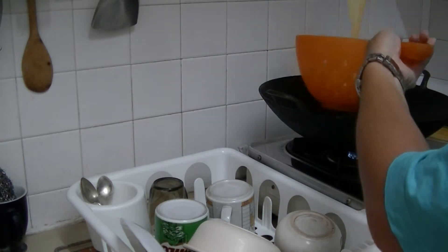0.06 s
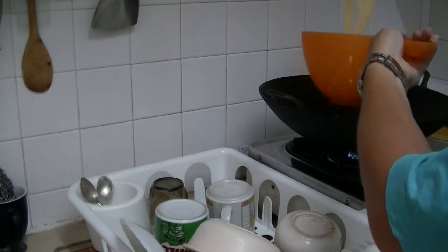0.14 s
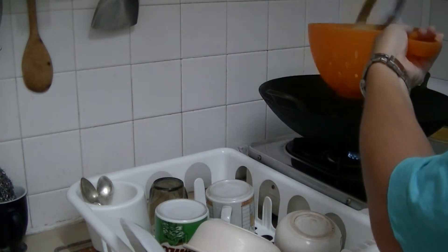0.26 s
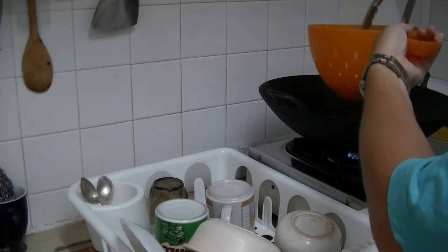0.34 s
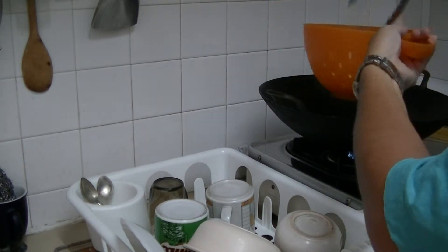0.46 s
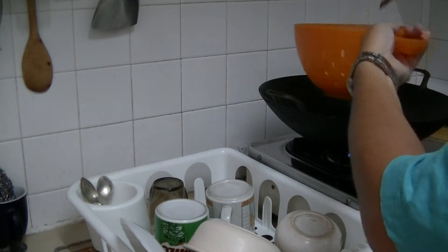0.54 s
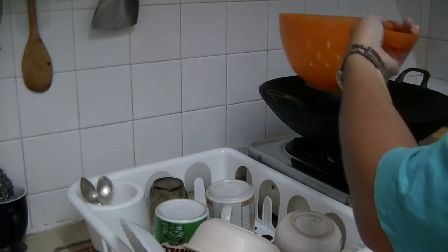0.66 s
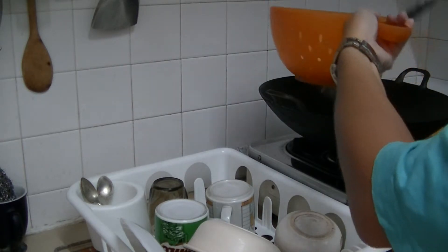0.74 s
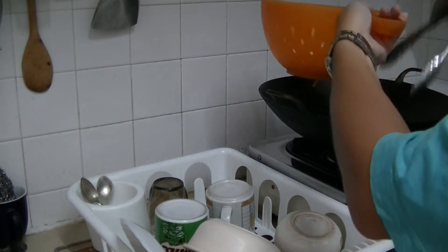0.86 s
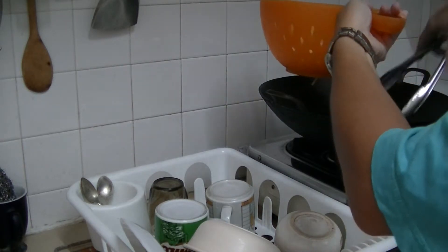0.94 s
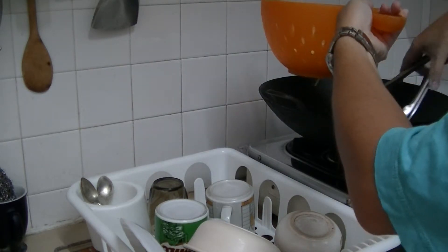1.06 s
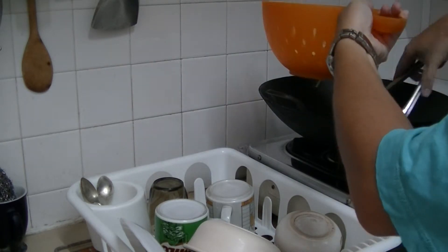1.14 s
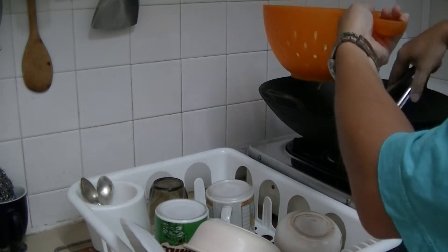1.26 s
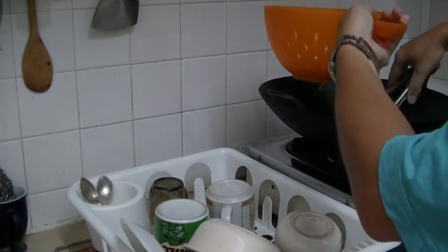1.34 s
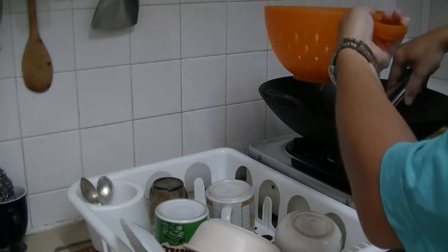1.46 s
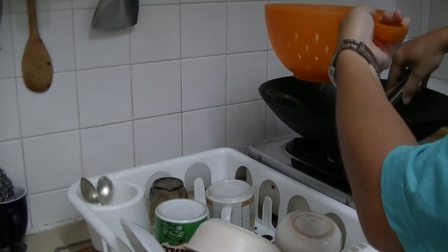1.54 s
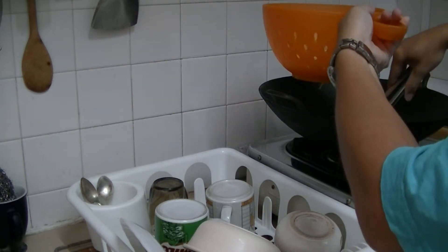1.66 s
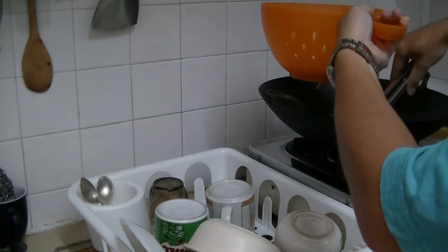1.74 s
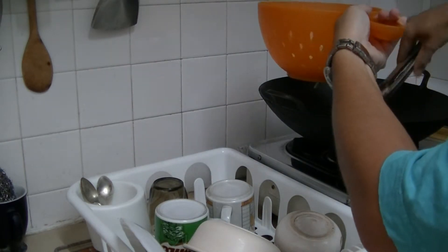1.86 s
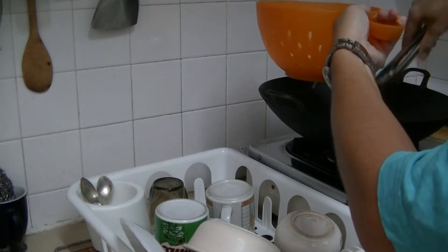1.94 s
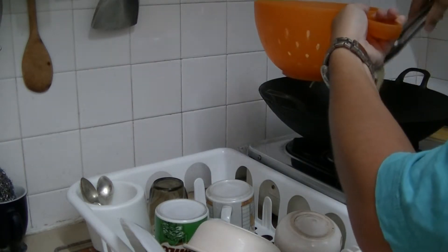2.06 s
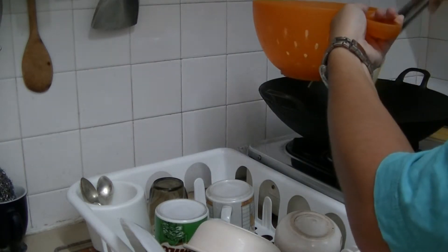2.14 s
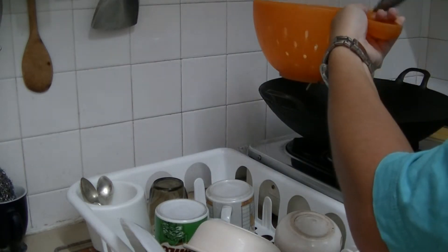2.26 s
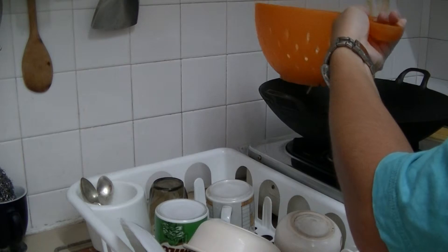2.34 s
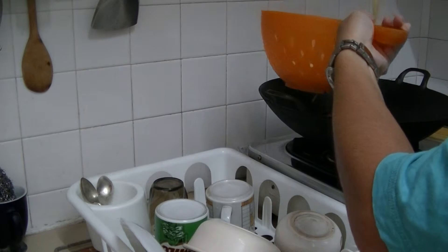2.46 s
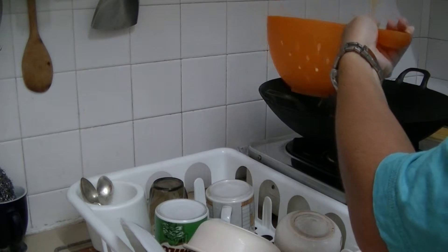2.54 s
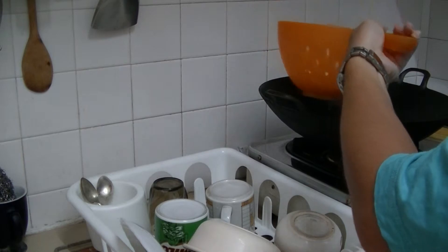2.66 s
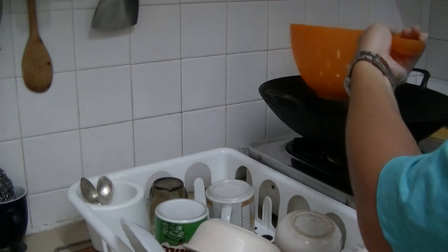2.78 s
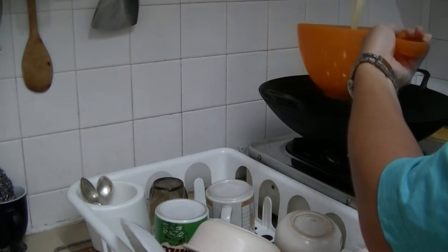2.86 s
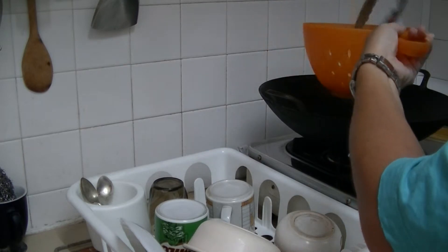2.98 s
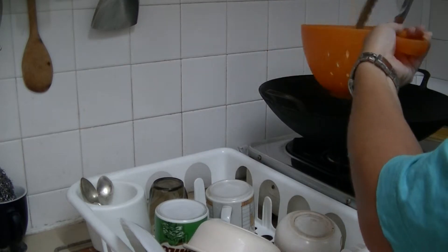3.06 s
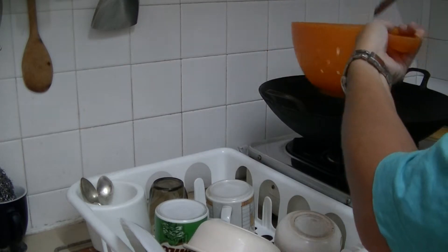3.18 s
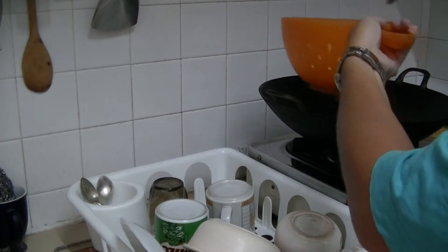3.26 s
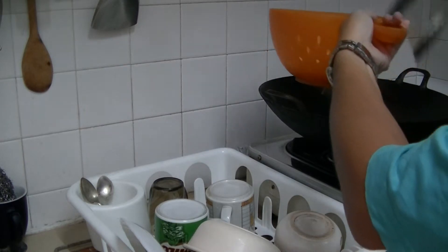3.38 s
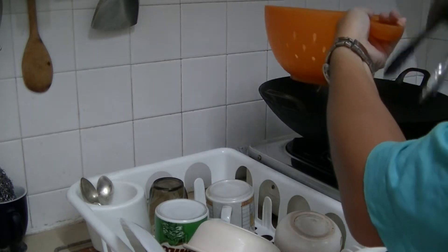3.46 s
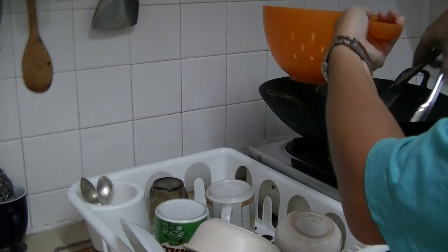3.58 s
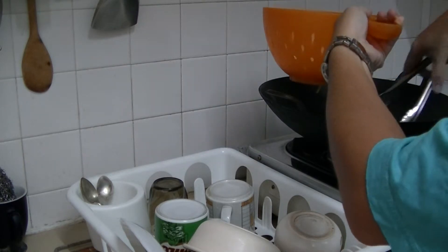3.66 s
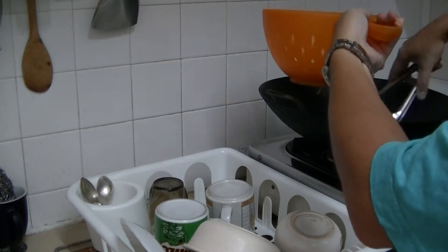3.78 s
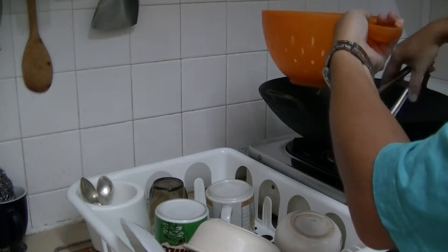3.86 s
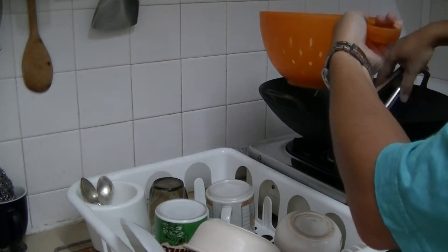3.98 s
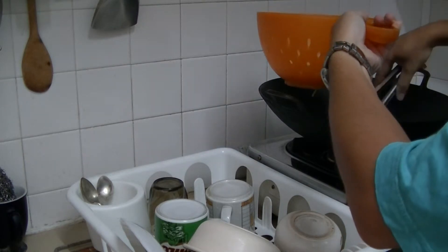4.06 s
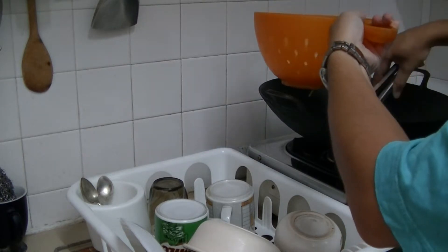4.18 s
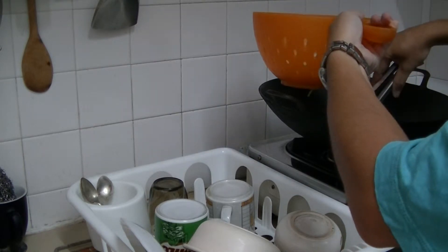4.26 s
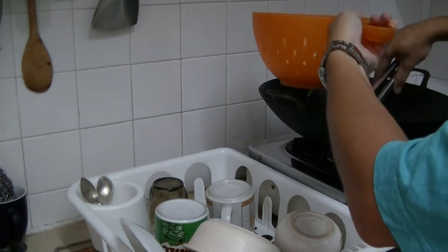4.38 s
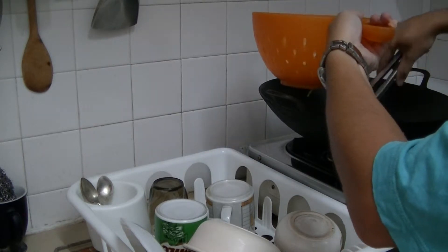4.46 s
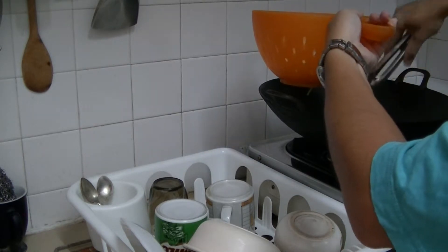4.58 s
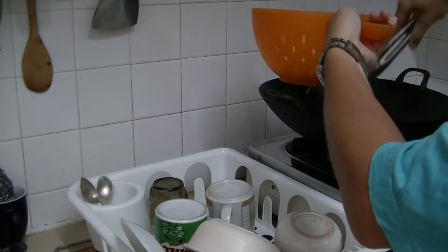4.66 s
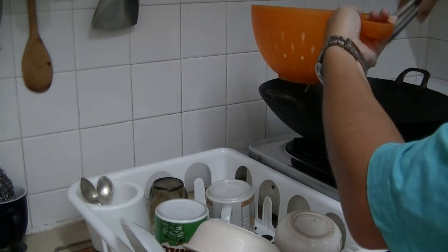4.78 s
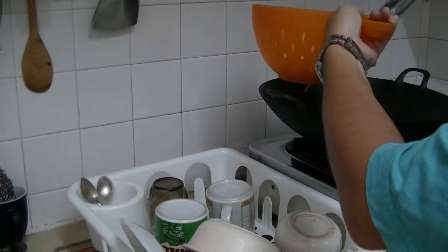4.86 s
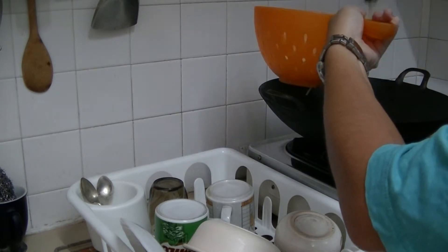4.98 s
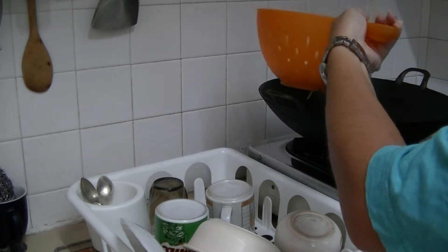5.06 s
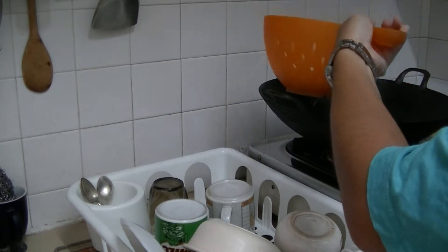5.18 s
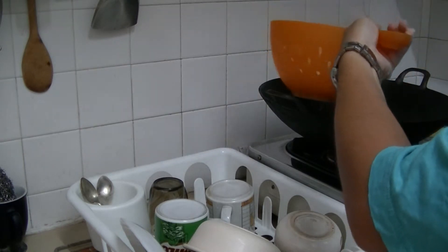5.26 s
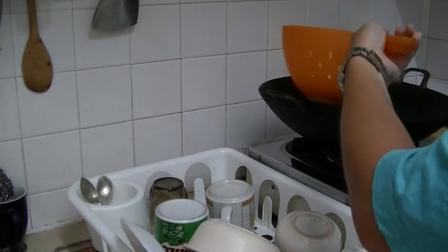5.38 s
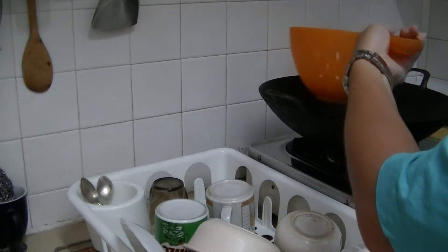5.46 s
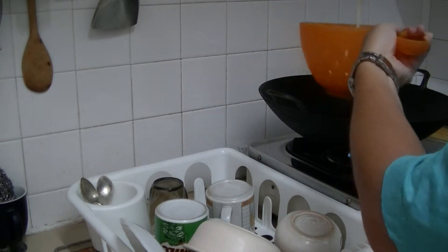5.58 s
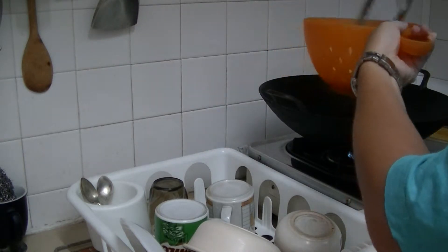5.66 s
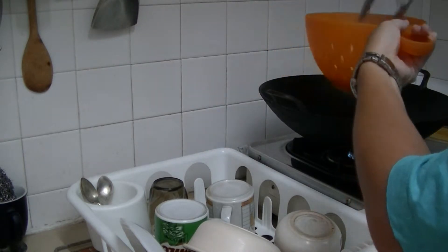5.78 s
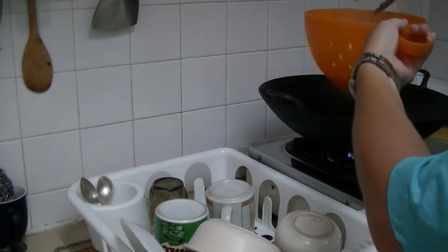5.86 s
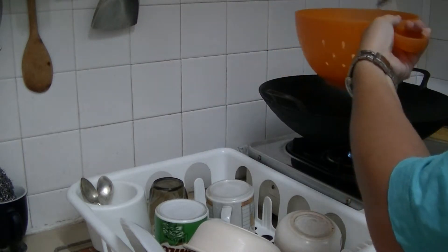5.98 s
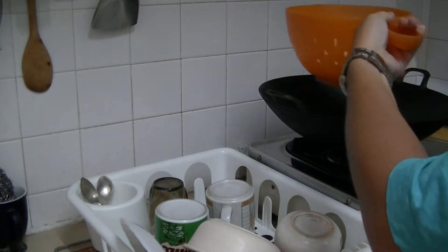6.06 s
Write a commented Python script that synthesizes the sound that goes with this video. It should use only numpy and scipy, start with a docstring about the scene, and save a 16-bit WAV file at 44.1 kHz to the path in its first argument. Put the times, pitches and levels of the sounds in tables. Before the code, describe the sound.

A gas burner hisses softly in a small tiled kitchen. Steel tongs click shut, then strike a wok with a ringing clash and scrape down its side. Pasta pats lightly into a plastic colander between clicks of the tongs. A second clash and scrape follow, then more pats and a last click. Very faint whistles come from far away now and then. The microphones are close to the wok.

```python
"""At the stove in a small tiled kitchen, two close microphones facing a wok; a gas ring hisses throughout.
Steel tongs click shut, and faint whistles come from far away. The tongs drop into the wok, clash and ring,
then scrape down its wall in tiny slips to gather pasta. Another far whistle; pasta pats into a plastic
colander between clicks of the tongs. They drop and scrape a second time, and more pats, a last whistle
and a last click follow."""
import sys
import numpy as np
from scipy import signal
from scipy.fft import rfft, irfft, next_fast_len
from scipy.io import wavfile

SR = 44100
rng = np.random.default_rng(int(sys.argv[2]) if len(sys.argv) > 2 else 0)


def waveform_to_disk(signal):
    """Save audio, clipped to [-1, 1], as 16-bit WAV at the path in sys.argv[1]."""
    frames = np.transpose(np.atleast_2d(signal))
    scaled = np.clip(frames, -1, 1) * 32767
    samples = np.round(scaled).astype(np.int16)
    wavfile.write(sys.argv[1], SR, samples)


N = 269705
TIME = np.arange(N) / SR

# tongs hit the wok: start_s, ring_db, clash_db, arm (0 first, 1 second), bite_db (added tip pressure)
BLOWS = [(1.1375, -32, -18, 0, 0), (1.1407, -20, -20, 0, 0), (1.148, -49, -26.5, 0.3, 0),
         (1.283, -31, -32, 0.2, 6), (1.424, -50, -59, 0.1, 3), (3.574, -35, -20.5, 0.9, 0),
         (3.579, -15.5, -20, 0.87, 0), (3.724, -30.5, -31, 0, 1.5), (3.878, -51, -37, 0.4, 1),
         (4.005, -56, -38, 0.07, 5), (4.11, -61, -50, 0.1, 3)]
# modes of the tongs against the wok: pitch_hz, t60_s, first_arm_db, second_arm_db
STEEL_MODES = [(279, 0.9, -37, -32), (640, 0.25, -25, -45), (860, 0.3, -23, -41), (2334, 0.3, -11, -28),
               (2482, 0.28, -13, -27), (2808, 0.3, -15, -35), (3025, 0.22, -10, -16),
               (3323, 0.33, -10, -29), (3383, 0.25, -14, -27), (3515, 0.14, -3, -12), (3569, 0.16, -3, -3),
               (3647, 0.28, -13, -12), (3797, 0.22, -4, 1), (3869, 0.24, -10, -16), (4166, 0.3, -8, -27),
               (4440, 0.15, -10, -28), (4524, 0.17, -7, -30), (4773, 0.26, -8, -13), (5003, 0.27, -16, -10),
               (5100, 0.2, -18, -24), (5411, 0.27, -18, -22), (5647, 0.24, -10, -33),
               (6240, 0.15, -21, -21), (7246, 0.2, -14, -26), (7510, 0.2, -20, -29), (7825, 0.18, -32, -23)]


def clashes(dense_db=-6, crack_t60_s=0.048, hardness=0.4):
    """Each blow wakes the dense modes of the thin steel, with a crack that is weak in soft touches."""
    # spectrum of the dense modes, one list an arm: frequency_hz, density_db
    arm_spectra = [
        [(200, -56), (400, -39), (620, -9), (900, -21), (1700, -19), (2300, -3), (2900, -4.5), (3450, -0.5),
         (4100, -8.5), (4650, -3), (6500, -6.5), (8000, -7.5), (11000, -20), (16000, -33)],
        [(200, -46), (650, -19), (1800, -23.5), (2450, -10), (3000, -11), (3650, -2), (4300, -13), (5000, -1.5),
         (5650, -7), (6250, -3), (6900, -13), (7700, -9.5), (10000, -13), (16000, -34)],
    ]
    # how they die: frequency_hz, t60_s
    decay = [(300, 0.67), (2200, 0.32), (4000, 0.41), (8000, 0.13), (15000, 0.27)]
    out = np.zeros(N)
    hardest_db = max(blow[2] for blow in BLOWS)
    for start_s, _, clash_db, arm, _ in BLOWS:
        spectrum = arm_spectra[int(arm > 0.5)]
        crack_db = clash_db + hardness * (clash_db - hardest_db)
        add(out, start_s, from_db(clash_db + dense_db) * dense_ring(spectrum, decay))
        add(out, start_s, from_db(crack_db) * dense_ring(spectrum, [(1000, crack_t60_s)]))
    return out


def arm_rings():
    """The clear ring of the tongs on the wok; the arm that lands sets the balance of the modes."""
    out = np.zeros(N)
    hz, t60_s, first_db, second_db = np.transpose(STEEL_MODES)
    for start_s, ring_db, _, arm, _ in BLOWS:
        add(out, start_s, ringing(hz, ring_db + first_db + arm * (second_db - first_db), t60_s))
    return out


def scrapes(slips_per_s=3000, uneven_db=3, catch_db=2, damping_hz=12, body_ratio=0.34, soft_hz=10500):
    """Tiny slips of the tips excite the steel, the tips' bending mode and the body of the wok."""
    # rubbed steel: frequency_hz, density_db
    rub_spectrum = [(150, -26), (250, -5.5), (278, -21), (436, -25), (468, -42), (519, -16), (775, -24),
                    (922, -2.5), (1730, -8.5), (2280, -3), (2670, 3.5), (3400, -1), (7190, -14.5),
                    (10900, -16.5), (16000, -29)]
    # its resonances: centre_hz, width_hz, level_db
    rub_peaks = [(2820, 21, -3), (3270, 78, 1.5), (3720, 92, -5), (4130, 100, 3.5), (4510, 13, -1),
                 (4810, 40, -0.5), (4880, 12, -15), (5410, 54, 1), (6030, 110, -1.5), (6860, 24, 3)]
    sizes = from_db(uneven_db * np.minimum(rng.exponential(1, N), 4)) * rng.choice([-1, 1], N)
    slips = sizes * (rng.random(N) < slips_per_s / SR)
    slips *= from_db(catch_db * drift(110))   # the tips catch and let go
    steel = sum(from_db(db) * resonate(slips, hz, width + damping_hz) for hz, width, db in rub_peaks)
    # the struck modes sing under the slips too, a little damped by the pressure
    singing = sum(from_db(db / 2) * resonate(slips, hz, np.log(1000) / (np.pi * t60_s) + damping_hz)
                  for hz, t60_s, db, _ in STEEL_MODES if hz > 2000)
    friction = from_db(-4) * colour(slips, rub_spectrum) + from_db(-7) * (rms_one(steel) + rms_one(singing))
    gains, pitch_hz = stroke_motion()
    judder = from_db(-4) * gliding(slips, pitch_hz, width_hz=304)
    body = from_db(-3) * gliding(slips, pitch_hz * body_ratio, width_hz=208)
    out = tip_pressure() * np.sum(gains * [friction, judder, body], axis=0)
    return signal.sosfilt(signal.butter(2, soft_hz, fs=SR, output="sos"), out)   # the wet wall softens slips


def stroke_motion(attack_s=0.037, release_t60_s=0.23, hold_s=0.13, fall_hz_per_s=820):
    """As the tongs sink into the pasta three gains sag; the tips' bending pitch holds, then falls."""
    # slides down the wall, a long stroke then a light wipe, levels and pitch as each begins:
    # start_s, length_s, friction_db, judder_db, body_db, pitch_hz
    strokes = [(1.172, 0.33, -32, -31.5, -49, 2307), (1.59, 0.073, -56.5, -55, -58.5, 2100),
               (3.67, 0.42, -30.5, -32.5, -48, 2355), (4.205, 0.053, -52.5, -55, -63, 2220)]
    sag_db_per_s = np.array([[31], [28], [2]])   # friction, judder, wok body
    gains, pitch_hz = np.zeros((3, N)), np.full(N, strokes[0][-1], float)
    for start_s, length_s, *levels_db, start_hz in strokes:
        age_s = TIME - start_s
        sunk_s = np.clip(age_s, 0, length_s)
        contact = np.clip(age_s / attack_s, 0, 1) * fade(np.maximum(age_s - length_s, 0), release_t60_s)
        gains += contact * from_db(np.array(levels_db)[:, None] - sag_db_per_s * sunk_s)
        fall_hz = fall_hz_per_s * np.maximum(sunk_s - hold_s, 0)
        pitch_hz = np.where(age_s >= 0, start_hz - fall_hz, pitch_hz)
    return gains, pitch_hz


def tip_pressure(bite_lag_s=0.0071, ease_lead_s=0.023, ease_share=0.65):
    """Gain of the scrape as the tips ease off the wall just before a blow and bite in just after."""
    pressure_db = np.zeros(N)
    for start_s, *_, bite_db in BLOWS:
        bite = bump(start_s + bite_lag_s, width_s=0.026)
        ease = bump(start_s - ease_lead_s, width_s=0.018)
        pressure_db += bite_db * (bite - ease_share * ease)
    return from_db(pressure_db)


def tong_snaps(click_t60_s=0.057, ring_db=-15, vary_db=3):
    """The tips close on each other with a bright click and a thin ring, a little different each time."""
    # the tips meet: start_s, level_db
    snaps = [(0.4428, -48), (2.519, -45), (3.185, -38.5), (5.66, -32.5)]
    # their modes: pitch_hz, level_db, t60_s
    tip_modes = [(3070, -16, 0.24), (4250, -4, 0.057), (6089, 4, 0.078), (6270, -12, 0.065), (9220, 0, .1),
                 (9550, -6, .12), (10200, -5, 0.11)]
    # their click: frequency_hz, density_db
    click_spectrum = [(1000, -36), (3000, -3.5), (4500, -2.5), (6200, 3), (7400, -4), (9500, -5.5),
                      (12000, -14), (16000, -18)]
    out = np.zeros(N)
    hz, mode_db, t60_s = np.transpose(tip_modes)
    for start_s, level_db in snaps:
        varied_db = mode_db + vary_db * rng.standard_normal(len(hz))
        add(out, start_s, from_db(level_db + ring_db) * ringing(hz, varied_db, t60_s))
        add(out, start_s, from_db(level_db) * dense_ring(click_spectrum, [(1000, click_t60_s)]))
    return out


def colander_pats(t60_s=0.13, skirt_db=-15):
    """Dead little knocks on plastic, each with one broad resonance."""
    # light taps and pats: start_s, level_db, centre_hz, width_octaves
    pats = [(2.393, -44.5, 2370, 1.05), (2.496, -51.5, 685, 0.43), (2.552, -46.5, 2520, 0.62),
            (2.59, -57, 9000, 1.6), (2.669, -54, 3000, 1.5), (3.022, -49.5, 4530, 1.1),
            (4.223, -50.5, 3380, 1.5), (4.974, -42.5, 3080, 0.44), (5.011, -48.5, 3800, 1.2),
            (5.045, -49, 1630, 0.52), (5.181, -53, 5040, 1.8), (5.8, -56, 312, 0.56)]
    out = np.zeros(N)
    for start_s, level_db, centre_hz, octaves in pats:
        hump = [(centre_hz * 2 ** (k * octaves), skirt_db * abs(k)) for k in range(-2, 3)]
        add(out, start_s, from_db(level_db) * dense_ring(hump, [(1000, t60_s)]))
    return out


def far_whistles(blur_hz=95):
    """Faint gliding tones from far away, blurred by echoes into narrow bands of noise."""
    # each whistle: start_s, length_s, start_hz, end_hz, level_db
    glides = [(0.607, 0.18, 1040, 1050, -56.5), (0.818, 0.19, 1440, 1490, -60.5),
              (1.789, .16, 980, 934, -58), (5.268, 0.46, 1440, 1390, -59)]
    out = np.zeros(N)
    for start_s, length_s, start_hz, end_hz, level_db in glides:
        along = np.clip(TIME[:SR] / length_s, 0, 1)
        tone = gliding(rng.standard_normal(SR), start_hz + (end_hz - start_hz) * along, blur_hz)
        add(out, start_s, from_db(level_db) * np.sqrt(4 * along * (1 - along)) * tone)
    return out


def gas_ring(hiss_db=-55, rise_db_per_s=0.17, roar_db=-59, fade_db_per_s=2.5):
    """The burner under the wok: its hiss grows slowly while the soft roar of the flame dies down."""
    # the flame: frequency_hz, density_db
    roar_spectrum = [(100, -24.5), (280, -10), (450, -4), (800, -7.5), (2000, -25.5), (8000, -60)]
    roar = colour(rng.standard_normal((2, N)), roar_spectrum)
    hiss_gain = from_db(hiss_db + rise_db_per_s * TIME)
    roar_gain = from_db(roar_db - fade_db_per_s * TIME)
    return hiss_gain * spread(gas_hiss(), gas_hiss()) + roar_gain * spread(*roar)


def gas_hiss():
    """Broad gas hiss with a few high resonances, and beside it a low steady hum near 316 Hz."""
    # gas ring and room tone: frequency_hz, density_db
    spectrum = [(15, -48), (25, -9.5), (114, -16), (293, -10.5), (317, 3), (344, -10), (416, -4),
                (1020, -4.5), (1520, -6.5), (2160, -2.5), (2760, -7), (3920, -5), (4610, -8.5),
                (14800, -25.5), (16000, -32)]
    # the low hum, then the resonances in the hiss: centre_hz, width_hz, level_db
    peaks = [(316.3, 26, -16.5), (2167, 210, -9.5), (2622, 10.5, -15.5), (3100, 56, -13.5), (3404, 13, -14)]
    white, excitation = rng.standard_normal((2, N))
    tones = sum(from_db(db) * rms_one(resonate(excitation, hz, width)) for hz, width, db in peaks)
    return colour(white, spectrum) + tones


def kitchen(x, wet_db=-6.5, first_echo_s=0.0031, t60_s=0.45):
    """Tiled walls close by answer with a short bright tail."""
    decay = [(300, t60_s), (4000, t60_s), (14000, 0.3)]   # frequency_hz, t60_s
    tails = [dense_ring([(100, -1), (16000, -1.5)], decay) for _ in range(2)]
    echo = spread(*tails) * np.clip(TIME[:SR // 2] / first_echo_s - 1, 0, 1)
    echo /= np.sqrt(np.sum(echo ** 2) / 2)
    return x + from_db(wet_db) * signal.fftconvolve(x[None], echo, axes=1)[:, :N]


def spread(mid, side):
    """Diffuse sound at two close microphones: alike in the treble, less so in the bass."""
    # likeness of left and right: frequency_hz, correlation
    likeness = [(40, 0), (125, 0.18), (250, 0.78), (600, 0.59), (1200, 0.62), (2200, 0.93), (4500, .96),
                (8000, 0.95), (15000, 1)]
    size = next_fast_len(len(mid))
    alike = at_hz(likeness, np.arange(size // 2 + 1) * SR / size)
    common = np.sqrt((1 + alike) / 2) * rfft(mid, size)
    opposed = np.sqrt((1 - alike) / 2) * rfft(side, size) * [[1], [-1]]
    return irfft(common + opposed, size)[:, :len(mid)]


def ringing(hz, db, t60_s, build_cycles=9):
    """The sum of struck modes; each takes some cycles to build up, so the low ones swell late."""
    t = TIME[:SR, None]
    envelope = fade(t, t60_s) * (1 - np.exp(-t * hz / build_cycles))
    return (np.sin(2 * np.pi * hz * t) * envelope) @ (from_db(db) * rng.choice([-1, 1], len(hz)))


def dense_ring(spectrum, decay):
    """Countless close modes, each octave dying at its own rate; one decay row sets them all alike."""
    t, hz = TIME[:SR // 2], np.arange(SR // 4 + 1) * 2
    modes = rfft(colour(rng.standard_normal(len(t)), spectrum))
    octave = np.log2(np.clip(hz, 250, 16000) / 250)
    bands = [irfft(modes * np.maximum(1 - abs(octave - k), 0), len(t)) for k in range(7)]
    return sum(band * fade(t, at_hz(decay, 250 * 2 ** k)) for k, band in enumerate(bands))


def resonate(x, hz, width_hz):
    """One resonance, gain 1 at its peak."""
    r = np.exp(-np.pi * width_hz / SR)
    feedback = [1, -2 * r * np.cos(2 * np.pi * hz / SR), r * r]
    return signal.lfilter(np.array([1, 0, -1]) * (1 - r * r) / 2, feedback, x)


def gliding(x, hz, width_hz):
    """A resonance whose centre moves; rms 1."""
    turn = np.exp(2j * np.pi * np.cumsum(hz) / SR)
    r = np.exp(-np.pi * width_hz / SR)
    return rms_one((signal.lfilter([1], [1, -2 * r, r * r], x / turn) * turn).real)


def colour(x, spectrum):
    """Give a steady sound a spectrum; rms 1."""
    size = next_fast_len(x.shape[-1])
    gain = from_db(at_hz(spectrum, np.arange(size // 2 + 1) * SR / size))
    return rms_one(irfft(rfft(x, size) * gain, size)[..., :x.shape[-1]])


def drift(knots_per_s):
    """A random wander; rms 1."""
    knots = rng.standard_normal(4096)
    return rms_one(np.interp(TIME * knots_per_s, np.arange(len(knots)), knots))


def bump(centre_s, width_s):
    """A smooth swell of height 1."""
    return np.exp(-((TIME - centre_s) / width_s) ** 2)


def fade(t, t60_s):
    """Exponential decay."""
    return np.exp(-np.log(1000) * t / t60_s)


def at_hz(points, hz):
    """Read a table on a log-frequency axis."""
    points_hz, values = np.transpose(points)
    return np.interp(np.log(np.maximum(hz, 1)), np.log(points_hz), values)


def from_db(db):
    """Decibels to gain."""
    return 10 ** (np.asarray(db) / 20)


def rms_one(x):
    """Scale to rms 1."""
    return x / np.sqrt(np.mean(x ** 2) + 1e-20)


def add(out, start_s, sound):
    """Mix a sound in at a time."""
    i = round(start_s * SR)
    out[i:i + len(sound)] += sound[:N - i]


def scene(low_cut_hz=370):
    """The stove stands almost straight ahead of the microphones; small contacts radiate no bass."""
    contacts = clashes() + scrapes() + tong_snaps() + colander_pats()
    contacts = signal.sosfilt(signal.butter(3, low_cut_hz, "high", fs=SR, output="sos"), contacts)
    balance = from_db([[0.2], [-0.2]])   # left, right
    return (kitchen(contacts) + arm_rings() + far_whistles() + gas_ring()) * balance


def record(dry, cutoff_hz=16000):
    """The highest treble is cut steeply."""
    return signal.sosfilt(signal.ellip(10, 0.1, 80, cutoff_hz, fs=SR, output="sos"), dry)


dry = scene()
out = record(dry)
waveform_to_disk(out)
```